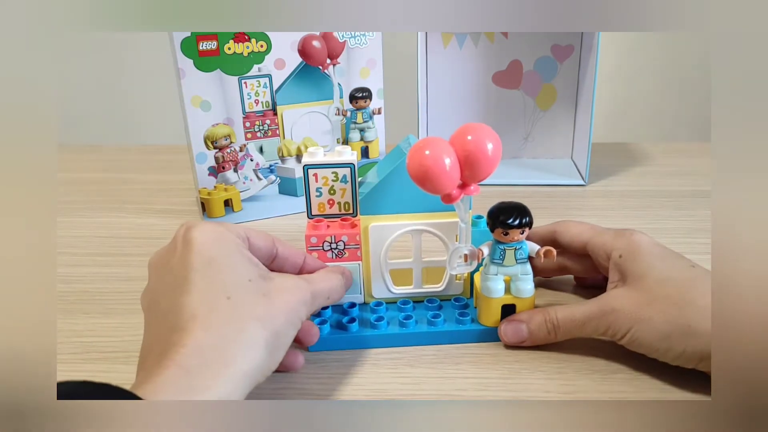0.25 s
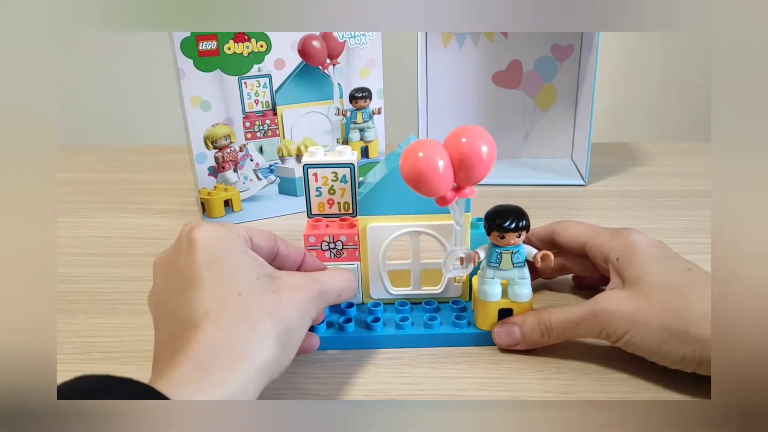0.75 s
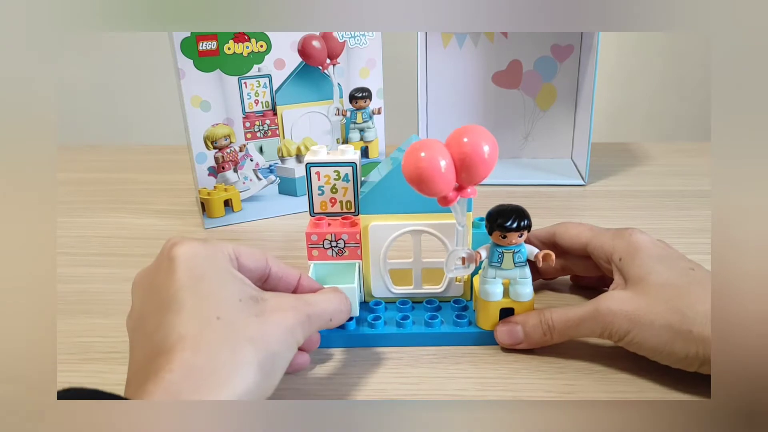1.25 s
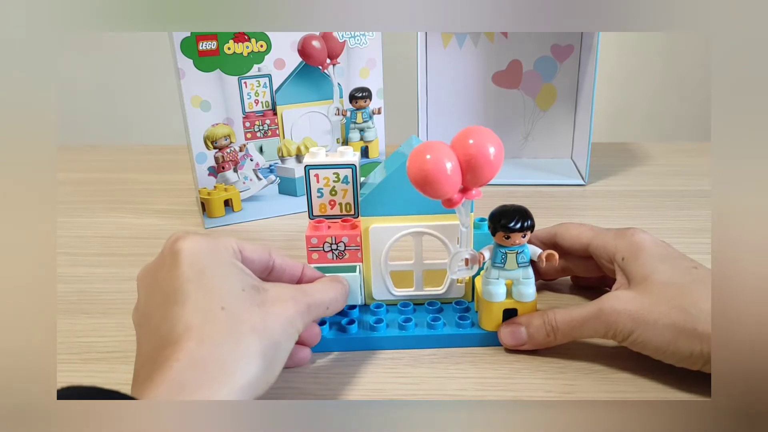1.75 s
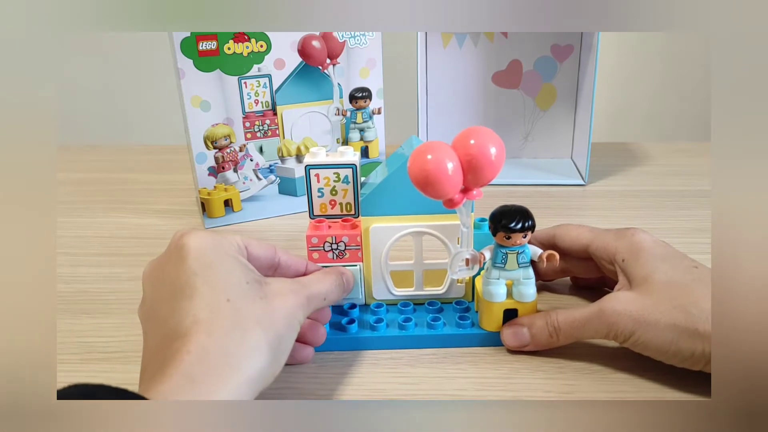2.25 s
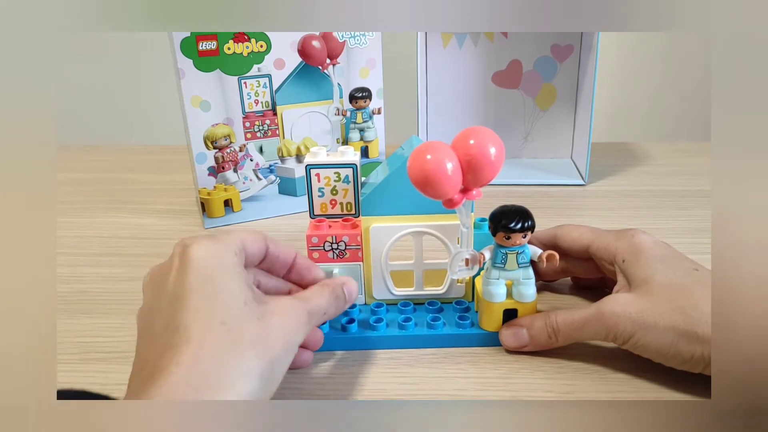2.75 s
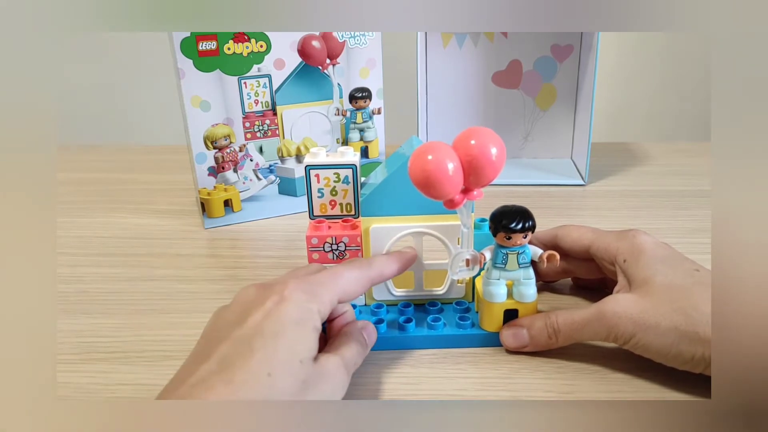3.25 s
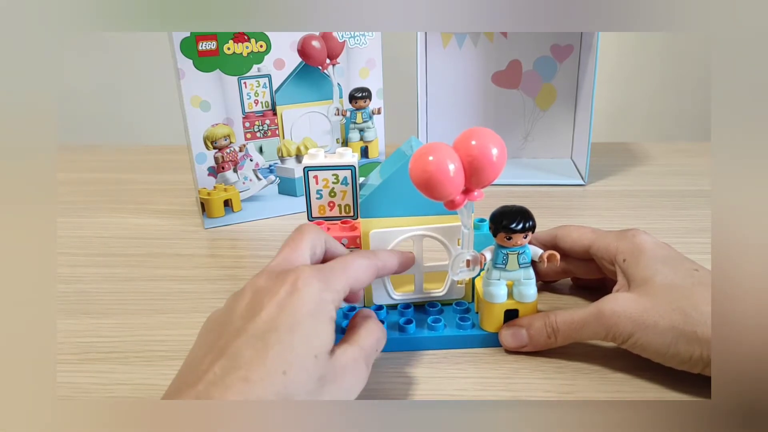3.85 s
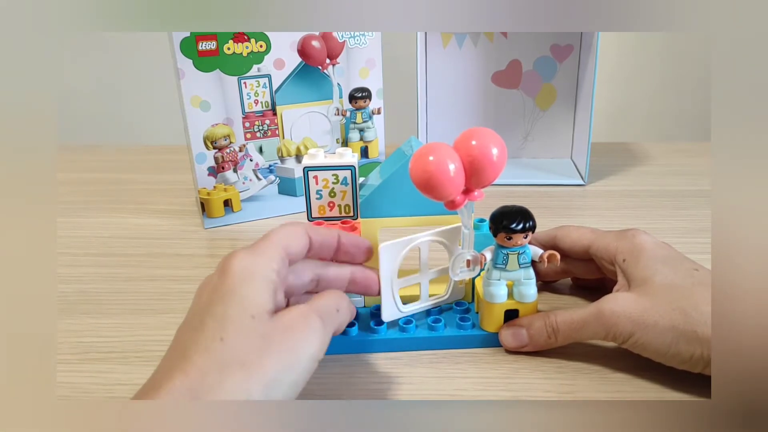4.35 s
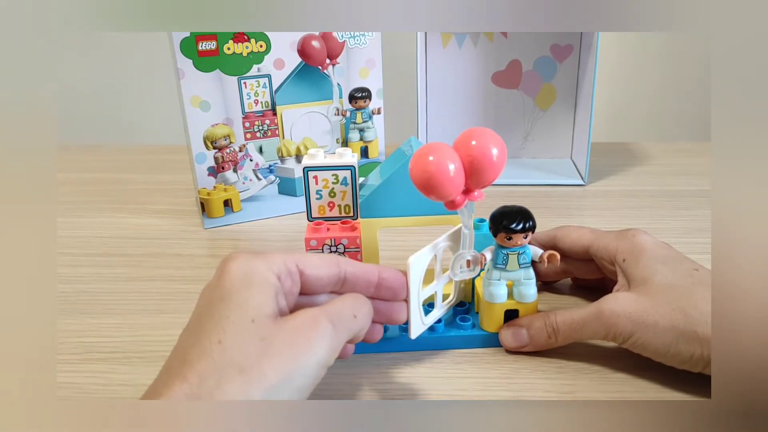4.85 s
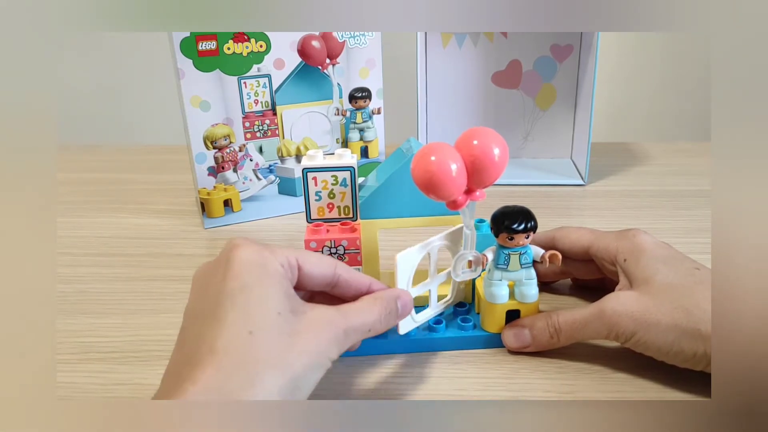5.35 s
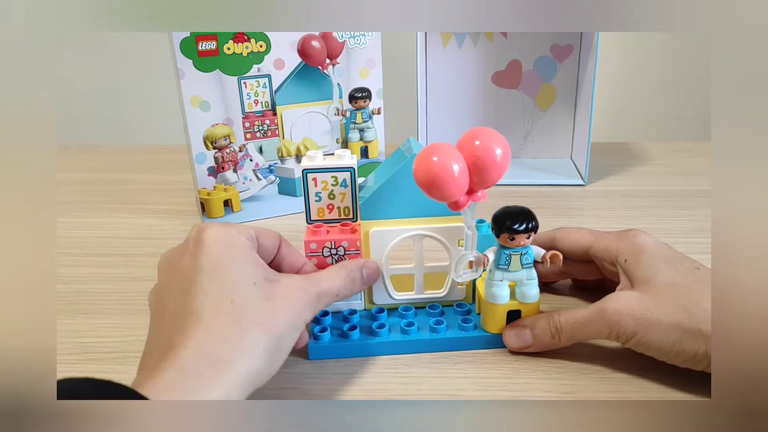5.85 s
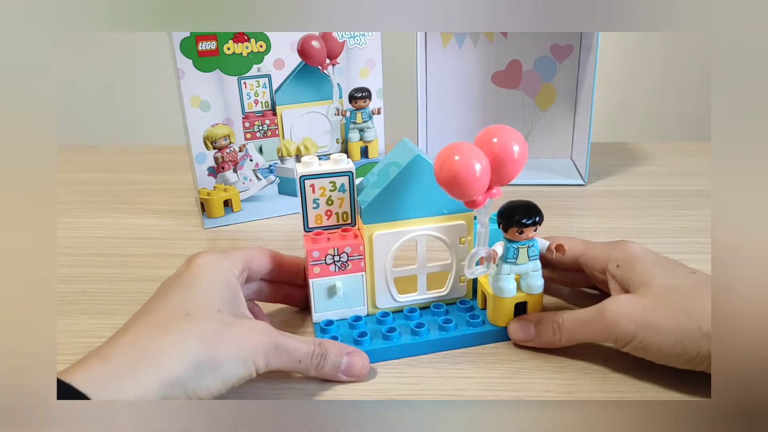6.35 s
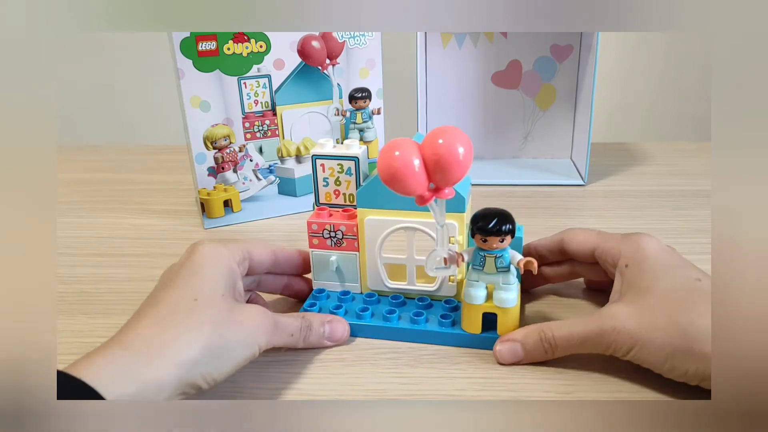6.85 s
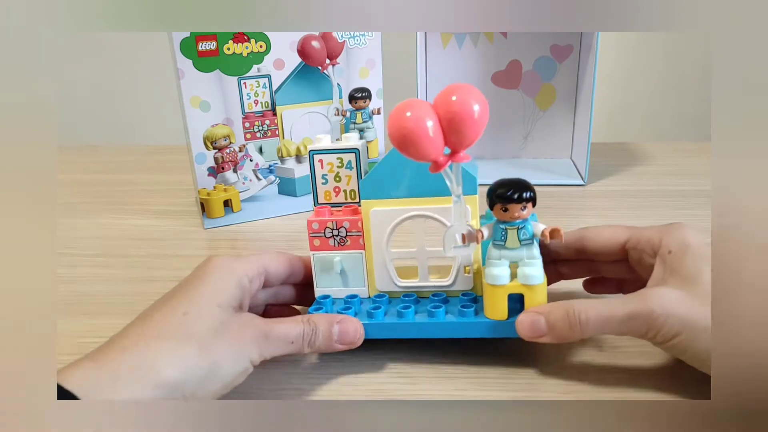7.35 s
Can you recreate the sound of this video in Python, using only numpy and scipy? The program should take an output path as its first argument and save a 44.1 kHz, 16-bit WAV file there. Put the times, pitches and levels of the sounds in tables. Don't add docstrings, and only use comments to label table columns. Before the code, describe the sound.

Close stereo microphones in a bare room hear hands on a small hollow plastic toy house. Faint taps and skin rubs come first, then a rattling drawer clatter. After a quieter gap a little door ticks, swings and snaps loudly, knocks, and clicks shut sharply. Finally the base shifts, knocks on the wooden table and is lifted with a click, over low room rumble and faint hiss.

```python
import sys
import numpy as np
from scipy import signal
from scipy.fft import rfft, irfft, next_fast_len
from scipy.io import wavfile
from scipy.ndimage import map_coordinates

SR = 44100
rng = np.random.default_rng(int(sys.argv[2]) if len(sys.argv) > 2 else 0)


def log_audio(samples):
    frames = np.atleast_2d(samples).T
    limited = np.clip(frames, -1, 1)
    pcm = np.round(limited * 32767).astype(np.int16)
    wavfile.write(sys.argv[1], SR, pcm)


def volts_from_db(level):
    exponent = np.asarray(level, float) / 20
    return 10 ** exponent


N = 334895

# pitch in Hz, width in Hz, level in dB.
SHELL_MODES = [(847, 95, -3.5), (1180, 224, 0), (1570, 150, -0.5), (2020, 400, -4.5), (2517, 230, 1),
               (2880, 1380, -3.5)]
# pitch in Hz, width in Hz, level in dB.
BASE_MODES = [(250, 246, 0), (430, 225, -0.5), (614, 102, -1)]


def along(points, hz):
    f, v = np.transpose(points)
    return np.interp(np.log(hz + 1), np.log(f + 1), v)


def unit(x):
    return x / np.sqrt(np.mean(x ** 2) + 1e-20)


def wobble(rate):
    knots = rng.standard_normal(int(N * rate / SR) + 4)
    return map_coordinates(knots, [np.arange(N) * rate / SR])


def filtered(x, response):
    m = next_fast_len(N + SR // 2)
    hz = np.fft.rfftfreq(m, 1 / SR)
    return irfft(rfft(x, m) * response(hz), m)[..., :N]


def modes(table):
    def response(f):
        total = 0
        for k, (centre, width, db) in enumerate(table):
            damping = 1j * f * width
            total = total + (-1) ** k * volts_from_db(db) * damping / (centre * centre - f * f + damping)
        return total
    return response


def spread(pair, gain=lambda hz: 1):
    # frequency in Hz, correlation from 0 to 1.
    likeness = [(30, 0.27), (130, 0.84), (300, 0.92), (650, 0.071), (1400, 0.015), (15000, 0.01)]

    def mid_side(hz):
        angle = np.arccos(np.clip(along(likeness, hz), -1, 1)) / 2
        return gain(hz) * np.array([np.cos(angle), np.sin(angle)])
    mid, side = filtered(pair, mid_side)
    return np.array([mid + side, mid - side])


def grain(depth_db, rate=120):
    return rng.standard_normal((2, N)) * volts_from_db(depth_db * wobble(rate))


def strokes(rows, rest_db):
    softest = 0.03
    t = np.arange(0, N, 32) / SR
    s, db, swell, fade = np.transpose(rows)[:, :, None]
    before = (s - t) / np.maximum(swell, softest)
    after = (t - s) / np.maximum(fade, softest)
    drop_db = 10 * np.where(t < s, before, after)
    power = volts_from_db(2 * rest_db) + np.sum(volts_from_db(2 * (db - drop_db)), axis=0)
    return np.interp(np.arange(N) / SR, t, np.sqrt(power))


def lasting(events, law):
    return [(s, db, hz, along(law, hz)) for s, db, hz in events]


def ringing(events, unsteady, rise):
    out = np.zeros(N + SR)
    t = np.arange(SR // 3) / SR
    for s, db, hz, t60 in events:
        drift = np.cumsum(rng.standard_normal(len(t))) * unsteady
        ring = np.sin(2 * np.pi * hz * t + drift) * (1 - np.exp(-t / rise))
        out[round(s * SR):][:len(t)] += volts_from_db(db - 60 * t / max(t60, 0.01)) * ring
    return np.array([out[:N], out[:N]])


def rumble():
    # frequency in Hz, level in dB per Hz.
    air_spectrum = [(24, -4), (60, -25), (103, -21), (170, -13), (232, 1.5), (270, -9.5), (330, -8.5),
                    (430, -16), (600, -26), (800, -22.5), (1200, -33), (2000, -36), (3500, -45.5),
                    (8000, -57)]
    capsule_db = [
        [-113],
        [-78.5],
    ]
    air = unit(spread(rng.standard_normal((2, N)), lambda hz: volts_from_db(along(air_spectrum, hz))))
    whine = unit(filtered(rng.standard_normal((2, N)), modes([(1595, 40, 0)])))
    air_db = -55 + 0.11 * wobble(1.77)
    whine_db = -81 + 2.2 * wobble(9)
    hiss = volts_from_db(capsule_db) * rng.standard_normal((2, N))
    return volts_from_db(air_db) * air + volts_from_db(whine_db) * volts_from_db([[2.5], [-2.5]]) * whine + hiss


def room(x, wet_db, gap, size):
    # frequency in Hz, time to fall 60 dB in seconds.
    decay = [(200, 0.39), (600, 0.59), (2000, 0.65), (5000, 0.59), (9000, 0.41), (10800, 0.27)]
    frames = dict(fs=SR, nperseg=size, noverlap=3 * size // 4)
    hz, t, z = signal.stft(x, **frames)
    keep = volts_from_db(-120 * (t[1] - t[0]) / along(decay, hz))
    power = np.mean(np.abs(z) ** 2, axis=0)
    held = np.array([signal.lfilter([1 - k], [1, -k], row) for k, row in zip(keep, power)])
    noise = signal.stft(rng.standard_normal((2, N)), **frames)[2]
    tail = signal.istft(noise / np.abs(noise).mean() * np.sqrt(held), **frames)[1]
    late = np.pad(tail, ((0, 0), (round(gap * SR), 0)))[:, :N]
    return volts_from_db(wet_db) * spread(late)


def wrists():
    # time in seconds, level in dB.
    shifts = [(0.646, -51.5), (1.075, -47), (1.95, -54), (4.05, -65), (4.29, -57), (4.57, -59.5),
              (4.85, -54), (5.47, -49.5), (5.55, -50.5), (6.1, -54), (6.72, -61), (6.89, -49.5), (7.2, -68)]
    swell, fade = 0.034, 0.096
    shake = spread(grain(3.2), lambda hz: modes([(120, 110, 0)])(hz) ** 2)
    return volts_from_db(-8.5) * strokes([(s, db, swell, fade) for s, db in shifts], -65) * unit(shake)


def drags():
    # hardest moment in seconds, level in dB, seconds to swell 10 dB, seconds to fade 10 dB.
    pulls = [(0.005, -51, -2, -1.2), (0.5, -58.5, 0.8, .35), (1.04, -57, .1, 0.5), (1.77, -61, -1, 0.3),
             (4.06, -45.5, 0, 0.17), (4.21, -53, 0.05, 0.35), (4.57, -50.5, .5, -1),
             (4.912, -45.5, 0.01, .5), (5.146, -63, 1, -0.67), (5.44, -38.5, -0.5, 0.0439),
             (5.545, -44, -0.13, 0.24), (5.8, -61, 2.5, 0), (6.724, -48.5, 0.4, 0.2),
             (7.208, -47.5, 0.36, 0.2), (7.376, -61.5, -1.5, 6)]
    drag = spread(grain(3.2), modes(BASE_MODES[1:]))
    return volts_from_db(-7.0) * strokes(pulls, -66) * unit(drag)


def rubs():
    # frequency in Hz, level in dB per Hz.
    skin_spectrum = [(500, -20), (1500, -5.5), (3000, -8.5), (4000, -8.5), (5000, -4.5), (6500, -4),
                     (9000, -7), (12000, -1.5), (14500, 4.5)]
    # fastest moment in seconds, skin hiss in dB, seconds to swell 10 dB,
    # seconds to fade 10 dB, plastic scrape over skin in dB.
    slides = [(0.005, -68, -1.5, 0.4, -10), (0.646, -60, 0.19, 0.15, 0.5), (1.02, -64, 0, 2.7, -5),
              (1.78, -66, 1.2, -0.8, -13), (2.43, -66, 0.35, 0, -4), (2.8, -65, -0.07, 0.1, -12),
              (2.88, -58, 0.11, 0.1, -27), (2.975, -62.5, 0, -0.05, -12), (3.335, -71, -0.2, 0.4, 0),
              (3.39, -64.5, 0.04, 0.08, 3), (3.676, -77.5, -0.03, -0.93, 18), (3.775, -70, -0.2, 0.2, -27),
              (4.03, -63, -0.12, 0.07, 10), (4.29, -75, -0.52, 0.02, 16), (4.567, -61, -0.17, 0.03, 0),
              (5.38, -65.5, 0, 1.1, 1), (6.098, -67, 1.16, -0.6, -5), (6.724, -59, 0.3, 0.1, -5),
              (7.208, -58.5, 0.47, -0.25, -5), (7.376, -58, 0.76, 0.8, -3)]
    # time in seconds, buzz in dB, seconds to fade 10 dB, scrape over
    # buzz in dB.
    lingering = [
        (1.074, -49.5, 0.0756, 7.5),
        (3.95, -68, 0.6, -7),
        (4.85, -60.5, 0.26, -2),
        (5.084, -82, -0.5, 9),
        (5.46, -61, 0.1, 4),
        (5.55, -64, 0.2, 2),
        (5.8, -56.5, 0.08, 4),
    ]
    buzz_top = 9300
    colour = lambda hz: volts_from_db(along(skin_spectrum, hz))
    skin = spread(grain(0.54), colour)
    buzz = spread(grain(0.65, 220), lambda hz: colour(hz) / (1 + (hz / buzz_top) ** 8))
    scrape = spread(grain(3.0), modes(SHELL_MODES))
    trailing = [(s, db, 0.031, fade, over) for s, db, fade, over in lingering]
    on_skin = strokes([row[:-1] for row in slides], -91)
    on_buzz = strokes([row[:-1] for row in trailing], -120)
    on_plastic = strokes([(s, db + over, a, b) for s, db, a, b, over in slides + trailing], -87)
    return (volts_from_db(4.0) * on_skin * unit(skin) + volts_from_db(-6.0) * on_buzz * unit(buzz)
            + volts_from_db(-3.5) * on_plastic * unit(scrape))


def low_rings():
    # time in seconds, peak in dB, pitch in Hz.
    thumps = [(1.058, -33, 550), (1.798, -43.5, 526), (3.659, -52, 596), (4.039, -39, 433),
              (4.24, -39.5, 504), (4.325, -29.5, 622), (4.7425, -19, 595), (4.7425, -26, 458),
              (4.759, -24.5, 430), (6.086, -34.5, 632), (6.605, -41, 617), (6.612, -38, 450),
              (7.073, -30, 463), (7.201, -28, 390), (3.931, -36.5, 729), (4.7445, -34, 1174),
              (4.329, -37, 948), (6.704, -41, 971)]
    # time in seconds, peak in dB, pitch in Hz.
    table_top = [(1.064, -45, 85.5), (3.924, -35.5, 199), (4.049, -41, 151), (4.307, -37, 267),
                 (4.359, -28.5, 261), (4.747, -52.5, 191), (4.753, -32, 344), (5.413, -28, 263.5),
                 (5.555, -31, 262), (6.084, -36, 220), (6.086, -41, 169), (6.728, -33.5, 193),
                 (7.076, -30, 280), (6.841, -35.5, 290), (7.149, -33, 300), (7.178, -24, 291),
                 (7.23, -31.5, 288), (7.261, -32.5, 303)]
    # time in seconds, peak in dB, pitch in Hz.
    hums = [
        (1.066, -39, 246.2),
        (3.922, -42.5, 282.4),
        (4.058, -38, 424),
        (4.185, -42.5, 497),
        (4.562, -43, 343),
        (4.749, -34, 246.7),
        (6.702, -41, 615),
    ]
    # pitch in Hz, time to fall 60 dB in seconds.
    wood = [(90, 0.18), (200, 0.053), (300, 0.098), (600, 0.11)]
    # pitch in Hz, time to fall 60 dB in seconds.
    hanging = [(250, 0.43), (600, 0.24)]
    events = lasting(thumps + table_top, wood) + lasting(hums, hanging)
    return ringing(events, unsteady=0.018, rise=0.0064)


def plastic_rings(plastic):
    # time in seconds, peak in dB, pitch in Hz.
    wall_rings = [(0.211, -51, 1130), (1.034, -38, 1060), (1.052, -26.5, 1193), (1.064, -51, 1030),
                  (1.799, -42.5, 1090), (2.817, -52.5, 1220), (3.335, -55, 1000), (3.393, -49, 1034),
                  (3.92, -34, 1180), (4.021, -37, 894), (4.044, -36.5, 765), (4.309, -30.5, 1146),
                  (4.549, -45.5, 1180), (4.719, -27.5, 892), (4.743, -19, 907), (5.411, -43, 1136),
                  (5.547, -60, 1020), (5.632, -50, 990), (5.74, -36.5, 902), (6.084, -35.5, 998),
                  (6.705, -34.5, 1125), (6.729, -42, 1140), (6.803, -50, 1130), (6.928, -53.5, 1140),
                  (6.964, -50, 860)]
    # time in seconds, peak in dB, pitch in Hz.
    panes = [(1.1338, -36.5, 2120), (1.9165, -48.5, 2070), (3.9214, -33, 1970), (4.0338, -34, 1565),
             (4.3085, -39, 1440), (4.7162, -31, 1970), (5.4141, -34.5, 1884), (5.549, -38, 1510),
             (5.5547, -36, 1814), (7.1814, -45, 1570), (7.2669, -43, 1635)]
    return ringing(lasting(wall_rings + panes, plastic), unsteady=0.077, rise=0.00084)


def stud_ticks(plastic):
    # time in seconds, peak in dB, pitch in Hz.
    tick_events = [
        (1.9175, -58, 6200),
        (4.7157, -34.5, 2610),
        (4.7157, -47, 6060),
        (4.7441, -33, 3130),
        (5.4121, -35.5, 4640),
        (5.7364, -27, 4960),
        (6.0821, -54, 5240),
        (7.2669, -49, 4260),
        (7.2669, -43, 3240),
    ]
    ticks = ringing(lasting(tick_events, plastic), unsteady=0.12, rise=0.0004)
    return volts_from_db(3.0) * filtered(ticks, lambda f: (1j * f / (900 + 1j * f)) ** 2)


def clear_tones():
    # time in seconds, peak in dB, pitch in Hz,
    # time to fall 60 dB in seconds.
    clear_modes = [(1.0595, -28, 577, 0.039), (1.0635, -31, 1094, 0.026), (1.111, -44, 3300, .025),
                   (3.345, -59, 970, .15), (3.618, -54, 625, 0.094), (3.654, -55, 593, 0.12),
                   (3.656, -54.5, 966, .08), (3.921, -43.5, 618, 0.066), (3.919, -39.5, 1405, .04),
                   (3.93, -49, 1982, .3), (3.93, -51, 773, 0.25), (4.034, -39, 1380, .05),
                   (4.06, -51, 853, 0.42), (4.049, -57, 1660, .6), (4.21, -62, 1680, .5),
                   (4.24, -52, 540, .2), (4.307, -35.5, 1300, 0.029), (4.309, -41.5, 894, .085),
                   (4.326, -39, 1147, 0.063), (4.326, -42.5, 618.6, 0.29), (4.335, -58, 1007, 0.25),
                   (4.7428, -23, 521, 0.091), (4.75, -38, 625, 0.24), (4.744, -35, 1040, .1),
                   (4.75, -43, 1166, 0.3), (4.75, -46, 2196, 0.46), (4.755, -37.5, 478, 0.46),
                   (4.75, -47, 787, 0.31), (4.75, -33, 903, 0.27), (5.411, -37, 1150, .05),
                   (5.414, -43, 1934, 0.084), (5.415, -47.5, 614, .4), (5.548, -37, 1500, .04),
                   (5.556, -38, 474, 0.062), (5.555, -49, 1800, .14), (5.631, -52, 1016, .08),
                   (5.738, -49, 1000, 0.25), (5.692, -48, 616, 0.25), (6.082, -46.5, 478, .1),
                   (6.928, -62, 6960, 0.018), (4.19, -50, 545, .3), (4.37, -47.5, 402, 0.32),
                   (4.07, -50.5, 540, .4), (7.17, -46, 638, 0.21), (7.07, -50.5, 793, .15),
                   (6.7, -49.5, 1880, .08)]
    # time in seconds, peak in dB, pitch in Hz.
    grains = [(1.0425, -46, 3500), (1.0455, -37, 8300), (1.064, -27, 7300), (1.071, -42, 7400),
              (1.076, -42, 2600), (1.084, -43, 7300), (1.097, -45, 7400), (1.099, -39, 2300),
              (1.110, -45, 7300), (1.123, -51, 4300), (1.1325, -42, 7400), (1.133, -37, 4500),
              (1.144, -43, 2300), (1.152, -46.5, 5500), (1.162, -49.5, 7400), (1.188, -52, 7400),
              (1.219, -53, 7430), (1.24, -52, 7300), (4.309, -48, 2640), (4.309, -41, 4870),
              (4.722, -46, 3600), (4.728, -48, 5000), (4.734, -48, 4200), (4.746, -17, 4300),
              (4.761, -36, 2300), (4.778, -34, 2100), (4.795, -39, 3000), (4.812, -39, 1900),
              (5.423, -48, 5200), (5.426, -49, 3900), (5.551, -44, 3200), (5.566, -50, 3000),
              (5.738, -40, 7500), (5.7405, -35, 8500), (7.18, -46, 1640), (7.11, -52, 1300),
              (6.928, -54, 6000), (6.929, -56, 8300), (3.385, -60, 5000), (3.398, -60, 5100),
              (3.36, -62, 4900), (5.632, -50, 1400), (1.136, -44, 3000), (1.139, -44, 1300),
              (4.246, -52, 1400), (7.07, -50, 1700), (7.195, -48, 900), (7.23, -50, 1100)]
    grain_cycles, rise_cycles = 20, 0.56
    out = np.zeros(N + SR)
    t = np.arange(SR // 2) / SR
    for s, db, hz, t60 in clear_modes + [(s, db, hz, grain_cycles / hz) for s, db, hz in grains]:
        ring = np.sin(2 * np.pi * hz * t) * (1 - np.exp(-t * hz / rise_cycles))
        out[round(s * SR):][:len(t)] += volts_from_db(db - 60 * t / max(t60, 0.002)) * ring
    return out[:N]


def contacts():
    # time in seconds, snap peak in dB, shell over snap in dB, knock over snap in dB,
    # left over right in dB.
    drawer = [(0.113, -52.5, -11, -9, -17), (0.2108, -62.5, 10, 22, 3), (0.63, -47.5, -3, -15, -6),
              (0.6506, -48, -7, 1, 7), (0.8872, -50.5, 1.5, -15, -2), (1.035, -40, -7, -20, 1),
              (1.0472, -28.5, -6.5, -26, -3), (1.0515, -27.5, -3, -4, 0), (1.0635, -27.5, -11.5, 2.5, -6),
              (1.1327, -33.5, -12, -10, -5), (1.7694, -52, -4, 10, 2), (1.7974, -51.5, -1, 9, 4),
              (1.8166, -50.5, 1, 11.5, -1), (1.9166, -53.5, 14.5, -10, 1), (2.4601, -49.5, -10, -2, -7)]
    door = [(3.6168, -71.5, 15, 20, 7), (3.6545, -67, 19, 24.5, 1), (3.921, -28, -10, -8, 5),
            (4.017, -34.5, -29, 0, -10.5), (4.035, -45, 5, -1, -1), (4.2442, -67, 14, 16, 4),
            (4.3076, -49.5, 12.5, 15, 0), (4.33, -60.5, 8, 22.5, 9.5), (4.4514, -57.5, 8, 5, 1),
            (4.4775, -50, 6.5, 16, 0), (4.7152, -40, 7.5, 8, 1), (4.743, -14.5, -3, -1, 1.5),
            (4.7475, -29, -12, -10, 7), (5.4105, -37.5, 2.5, 8.5, -3), (5.5472, -45.5, 5, -4, -5),
            (5.6314, -49.5, -13, 12, -4), (5.7349, -19.5, -19.5, -17, 0.5)]
    plate = [
        (6.082, -40.5, -3.5, 7, -0.5),
        (6.3621, -42, -17, 0.5, -10.5),
        (6.7032, -52, -10, 18.5, 6),
        (6.9292, -49, -26, -11, -5),
        (6.9624, -60, 11.5, 15, -6),
        (7.2652, -28.5, -16, -20, 1.5),
    ]
    scuffs = [(0.5556, -57.5, -7, 6, -1), (0.6994, -56, -14, -9, -6), (2.8085, -61.5, -9, 14, -1),
              (3.3331, -66, -10, -1, 0), (3.375, -63, -4, -12, -2), (5.395, -60, 11, 18.5, 1),
              (5.5358, -54, 10, 11, 0), (5.6992, -58, 6.5, 18, 2), (6.3364, -52.5, -19, 4, -5),
              (6.6035, -59.5, -0.5, 9, 5), (6.7979, -58.5, -8, 15, -4), (7.0668, -55, 0, 16, -2),
              (7.1724, -58, 7, 24.5, 0)]
    parts = [(drawer, 1.68), (door, 1.93), (plate, 2.3), (scuffs, 10)]
    t = np.arange(SR // 12) / SR
    snap, shell, knock = np.zeros((3, 2, N + len(t)))
    for rows, middling_ms in parts:
        for s, db, shell_db, knock_db, pan_db in rows:
            ms = middling_ms + 0.0536 * (db + 49)
            u = t / (max(ms, 0.3) / 1000)
            a, b, size = rng.standard_normal((3, len(t)))
            rattle = (u * np.exp(1 - u)) ** 2 * volts_from_db(1.57 * size)
            ears = volts_from_db(db + pan_db * np.array([[0.5], [-0.5]])) * rattle
            start = round(s * SR) - 30
            at = slice(start, start + len(t))
            snap[:, at] += ears * [a + 2.02 * b, a - 1.16 * b]
            shell[:, at] += volts_from_db(shell_db) * ears * [a + 0.39 * b, a - 0.91 * b]
            knock[:, at] += volts_from_db(knock_db) * ears * [a + 0.089 * b, a - 0.2 * b]
    bright = lambda f: (1j * f / (2600 + 1j * f)) ** 3 / (1 + 1j * f / 12000)
    walls = lambda f: modes(SHELL_MODES)(f) / (1 + 1j * f / 3000) ** 2
    body = volts_from_db(10.5) * filtered(shell, walls) + volts_from_db(11.0) * filtered(knock, modes(BASE_MODES))
    return volts_from_db(-8) * filtered(snap, bright), body


def scene():
    # pitch in Hz, time to fall 60 dB in seconds.
    plastic = [(760, 0.13), (900, 0.089), (1050, 0.052), (1500, 0.037), (1950, 0.058), (2800, 0.063),
               (6200, 0.046)]
    snap, body = contacts()
    body = body + volts_from_db(-5.0) * plastic_rings(plastic)
    body = volts_from_db(1.0) * filtered(body, lambda f: (1j * f / (230 + 1j * f)) ** 2)
    body = body + volts_from_db(-2.5) * low_rings()
    ticks = stud_ticks(plastic)
    tones = clear_tones()
    bright_tail = room(snap + volts_from_db(-12) * ticks, wet_db=-6.5, gap=0.0044, size=256)
    body_tail = room(body + volts_from_db(-6.5) * tones, wet_db=-3.0, gap=0.014, size=1024)
    near = snap + ticks + body + tones
    return near + bright_tail + body_tail + rubs() + drags() + wrists() + rumble()


def low_pass(x):
    return signal.sosfilt(signal.butter(12, 16600, fs=SR, output="sos"), x)


def record(dry):
    # pitch in Hz, width in Hz, level in dB.
    cavities = [(8650, 1100, 9), (7400, 520, 12)]
    # frequency in Hz, level in dB.
    tilt = [(100, 4), (400, 4), (1000, 2.5), (2500, -0.5), (5000, -5), (10000, -1.5)]
    # frequency in Hz, level in dB.
    roll_off = [(20, 0), (9000, 0), (9450, -3), (9750, -17), (11000, -19), (15500, -21), (16500, -40)]
    lag_samples, preamp_db = 5, -81.5
    sides = np.array([[0.5], [-0.5]])
    ports = lambda hz: np.array([1 + modes([cavity])(hz) for cavity in cavities])
    colour = lambda hz: volts_from_db(along(roll_off, hz) + sides * along(tilt, hz))
    lag = lambda hz: np.exp(-2j * np.pi * hz * sides * lag_samples / SR)
    heard = filtered(dry, lambda hz: ports(hz) * colour(hz) * lag(hz))
    hiss = filtered(rng.standard_normal(heard.shape), lambda hz: 1 / (1 + (hz / 13200) ** 16))
    return low_pass(heard + volts_from_db(preamp_db) * hiss)


dry = scene()
out = record(dry)
log_audio(out)
```